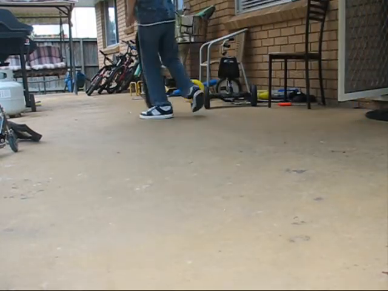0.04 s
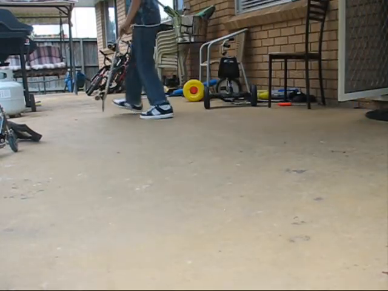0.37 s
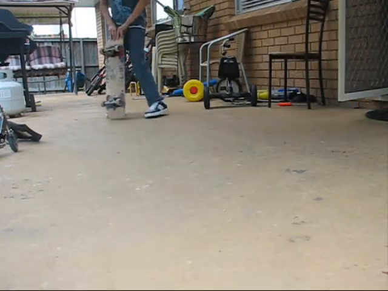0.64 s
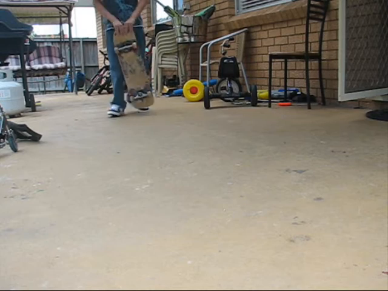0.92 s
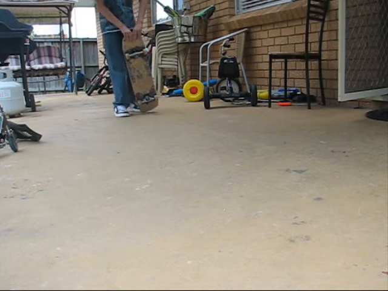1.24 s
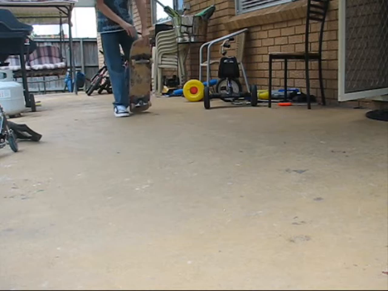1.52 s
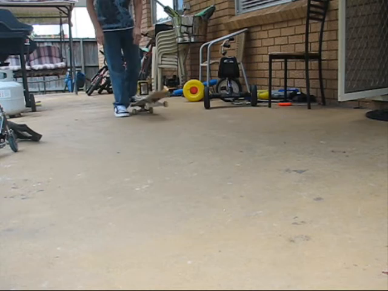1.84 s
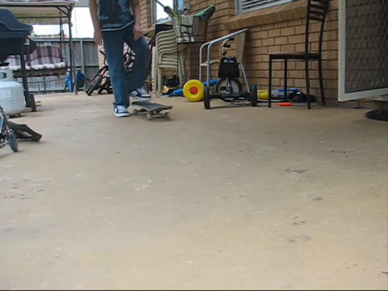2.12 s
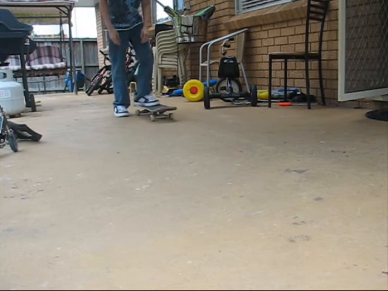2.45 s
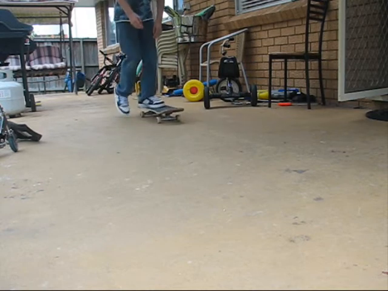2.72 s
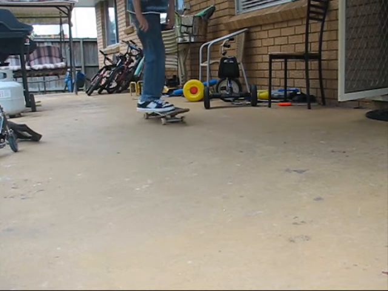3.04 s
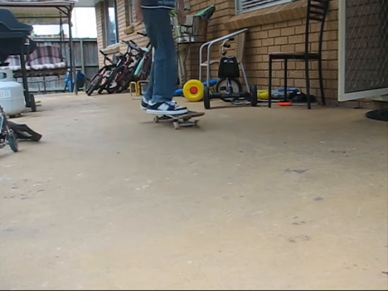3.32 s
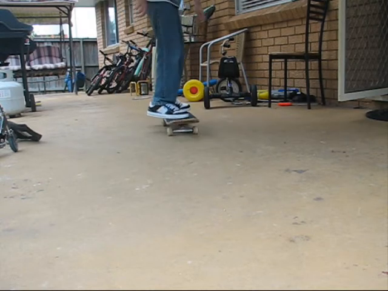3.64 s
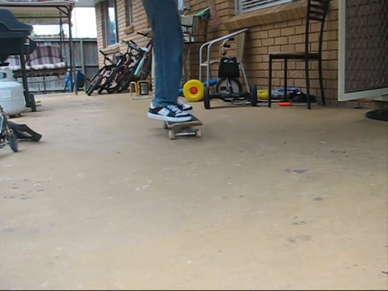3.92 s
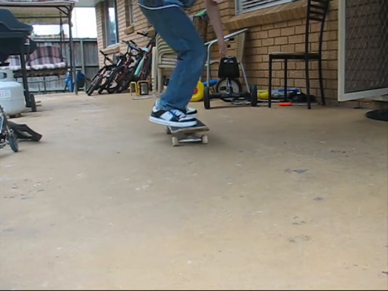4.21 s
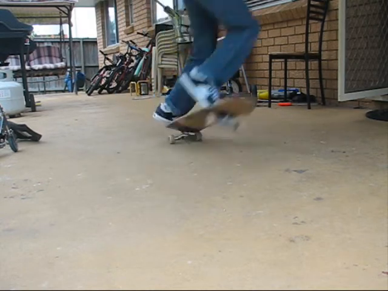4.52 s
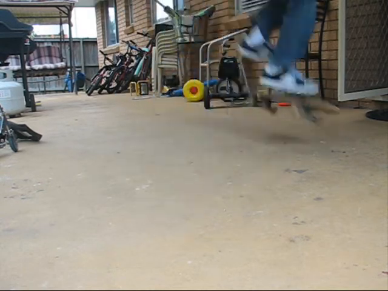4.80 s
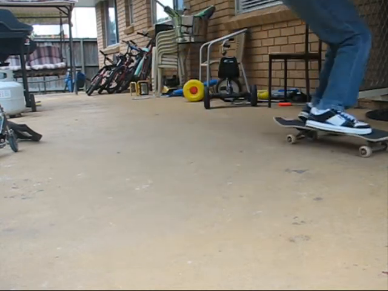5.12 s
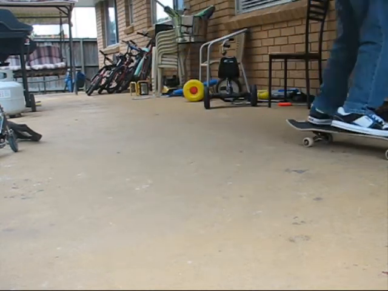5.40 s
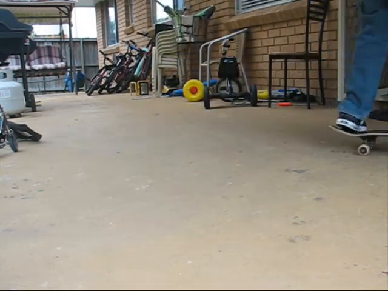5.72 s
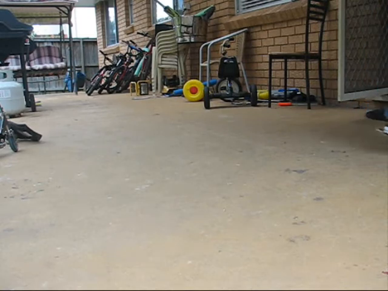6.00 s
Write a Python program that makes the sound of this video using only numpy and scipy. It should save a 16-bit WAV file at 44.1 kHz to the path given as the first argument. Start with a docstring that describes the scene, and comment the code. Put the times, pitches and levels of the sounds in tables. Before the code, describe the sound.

A light breeze rumbles under a soft distant wash throughout. A skateboard knocks lightly on concrete at about 0.6 seconds, then scrapes and clacks around 1 second. More wooden knocks come from 1.6 seconds, and at 2 seconds it drops onto its wheels with a clatter and a short roll. From 3 seconds the wheels rumble over grainy concrete, with single clacks at about 3, 3.3 and 3.7 seconds. Shoes and grip tape scuff around 4.4 seconds, the tail pops at 4.7, and the board lands in a loud cluster of clacks just before 5. The wheels ring unsteadily for about a second while rolling on, with further scuffs and knocks, a sharp one at 5.7 and lighter ones just after 6. Every hit rings the deck and echoes briefly off the patio wall and roof. The sound is lo-fi, with gritty treble.

```python
"""A light breeze rumbles under a distant wash; then a skateboard clacks on a roofed concrete patio.
It is knocked on its tail, dropped onto its wheels, rolled, pivoted, popped, landed and ridden off.
Each knock rings the wooden deck and echoes off brick wall and roof. Shoes and grip tape scuff,
wheels rumble over the concrete's grain and sing after the landing. A low-rate converter adds grit."""
import sys
import numpy as np
from scipy import signal
from scipy.fft import rfft, irfft
from scipy.io import wavfile
from scipy.ndimage import uniform_filter1d

SR = 44100
rng = np.random.default_rng(int(sys.argv[2]) if len(sys.argv) > 2 else 0)


def pcm_store(signal):
    """Save signal as 16-bit PCM."""
    levels = np.round(np.clip(np.atleast_2d(signal), -1, 1) * 32767)
    wavfile.write(sys.argv[1], SR, levels.astype(np.int16).T)


N = 271651


def amp(db):
    """Decibels to gain."""
    return 10 ** (np.asarray(db) / 20)


def unit_rms(x):
    """Scales to rms 1."""
    return x / np.sqrt(np.mean(x ** 2) + 1e-20)


def unit_energy(x):
    """Scales to energy 1 per channel."""
    return x / np.sqrt(np.sum(x ** 2, axis=-1, keepdims=True) + 1e-20)


def at_hz(points, hz):
    """Interpolates a table on a log-frequency axis."""
    points_hz, values = np.transpose(points)
    return np.interp(np.log(hz + 1), np.log(points_hz + 1), values)


def add(mix, start_s, sound):
    """Mixes a sound in at start_s."""
    part = mix[..., round(start_s * SR):][..., :sound.shape[-1]]
    part += sound[..., :part.shape[-1]]


def convolve(x, response):
    """Convolution cut to the length of x."""
    return signal.fftconvolve(np.atleast_2d(x), np.atleast_2d(response), axes=1)[:, :x.shape[-1]]


def colour(x, db_at, size=4096):
    """Minimum-phase filter with gain db_at(hz)."""
    hz = abs(np.fft.fftfreq(size, 1 / SR))
    log_gain = np.log(amp(np.maximum(db_at(hz), -100)))
    response = np.fft.ifft(np.exp(np.conj(signal.hilbert(log_gain)))).real
    return convolve(x, response[:size // 2])


def drift(length, smooth_samples):
    """Slow random wander, rms 1."""
    noise = rng.standard_normal(length)
    return unit_rms(uniform_filter1d(uniform_filter1d(noise, smooth_samples), smooth_samples))


def ringing(modes, t, spread_db):
    """Decaying sines; each blow shares its energy among them a little differently."""
    draws = rng.standard_normal((len(modes), 2))
    total = np.zeros(len(t))
    for (hz, db, t60_s), (deviation, phase) in zip(modes, draws):
        mode = np.sin(2 * np.pi * (hz * t + phase)) * amp(-60 * t / t60_s)
        total += amp(db + spread_db * deviation) * unit_energy(mode)
    return unit_energy(total)


# left-right coherence of diffuse sound (frequency [Hz], coherence [0-1])
COHERENCE = [(100, .975), (500, .975), (1000, .88), (2000, .74), (4000, .5)]

def diffuse(length):
    """White noise arriving from all sides at two close microphones."""
    mid, side = rfft(rng.standard_normal((2, length)))
    coherence = np.clip(at_hz(COHERENCE, np.fft.rfftfreq(length, 1 / SR)), 0, 1)
    mid *= np.sqrt((1 + coherence) / 2)
    side *= np.sqrt((1 - coherence) / 2)
    return irfft(np.array([mid + side, mid - side]), length)


# spectra of distant wash and breeze (frequency [Hz], relative density [dB])
WASH_SPECTRUM = [(20, -13.5), (70, -3), (150, -1), (300, -8), (600, -13.5), (1200, -14.5), (2200, -20),
                 (3500, -28.5), (5000, -32)]
BREEZE_SPECTRUM = [(5, -9.5), (20, -11), (33, -3), (45, -11), (70, -9), (110, -22), (300, -36.5),
                   (1000, -84)]
# low rumble, dipping briefly just after the landing (time [s], level [dB])
RUMBLE_LEVEL = [(0, -35.5), (1.55, -33), (2.0, -39), (2.7, -37.5), (4.6, -38.5), (5.1, -52), (5.7, -45),
                (6.16, -35)]

def outdoors(wash_db=-38.5, waver_db=0.5):
    """A soft distant wash and the low rumble of the breeze."""
    wash_gain = amp(wash_db + waver_db * drift(N, smooth_samples=3000))
    wash = unit_rms(colour(diffuse(N), lambda hz: at_hz(WASH_SPECTRUM, hz)))
    rumble_gain = amp(np.interp(np.arange(N) / SR, *np.transpose(RUMBLE_LEVEL)))
    rumble = unit_rms(colour(diffuse(N), lambda hz: at_hz(BREEZE_SPECTRUM, hz)))
    return wash_gain * wash + rumble_gain * rumble


def contact(chatter_s, touch=4.3, rise_s=.0005, side_db=-11, size=4096):
    """A hard first touch and a fast-dying chatter of wood and loose metal, spectrally flat."""
    t = np.arange(size) / SR
    burst = rng.standard_normal((2, size)) * np.exp(-t / chatter_s) * (1 - np.exp(-t / rise_s))
    burst[0, round(rise_s * SR)] += touch
    spectrum = rfft(burst, 2 * size)
    local_power = uniform_filter1d(abs(spectrum) ** 2, size=41, axis=1)
    flat = irfft(spectrum / np.sqrt(local_power))[:, :size]
    mid, side = flat * np.cos(np.pi / 2 * t / t[-1])
    side = amp(side_db) * signal.lfilter(*signal.butter(1, 1200, "high", fs=SR), side)  # bass stays mono
    return unit_energy(np.array([mid + side, mid - side]))


# modes of the board (frequency [Hz], relative level [dB], t60 [s])
DECK_MODES = [(172, -8, .1), (309, 0, .3), (370, -1, .35), (437, -3, .25), (492, -4, .2), (582, -7, .2),
              (675, -5, .22), (731, -1, .3), (812, -7, .16), (1032, -2, .22), (1388, -2, .2),
              (1507, -2, .22), (1870, -3, .18), (2293, -1, .24), (2653, 0, .28), (2913, -1, .22),
              (3073, 0, .28), (3269, 1, .26), (3424, 0, .26), (3536, 1, .26)]

def deck(t, spread_db, damping_db_per_s=0):
    """The wooden deck rings; feet and hands add damping."""
    return unit_energy(ringing(DECK_MODES, t, spread_db) * amp(-damping_db_per_s * t))


# patio reverberation (frequency [Hz], t60 [s])
PATIO_DECAY = [(100, 0.19), (300, 0.31), (700, 0.39), (1800, 0.31), (3200, 0.35), (5000, 0.29)]
# lingering patio resonances (frequency [Hz], relative level [dB], t60 [s])
PATIO_MODES = [(295, 1.8, 1), (352.2, 11.2, 1), (431, 5.1, .7), (498, 7, 0.55), (568, 7, 0.64), (725, 5, 1)]

def patio(t, build_s=0.0054, modes_db=-24):
    """Echoes off wall, roof and clutter build up, then die band by band over a few lingering tones."""
    hz, frame_s, bands = signal.stft(diffuse(len(t)), SR, nperseg=256)
    decay = amp(-60 * frame_s / at_hz(PATIO_DECAY, hz)[:, None])
    tail = signal.istft(bands * decay, SR, nperseg=256)[1][:, :len(t)]
    echoes = unit_energy(tail * (1 - np.exp(-t / build_s)))
    return echoes + amp(modes_db) * ringing(PATIO_MODES, t, spread_db=1.0)


def hump(hz, centre_hz, relative_width):
    """Resonance curve: 0.8 at the centre, -0.2 far from it."""
    return 1 / (1 + ((hz - centre_hz) / (relative_width * centre_hz)) ** 2) - .2


# mean spectrum of a knock (frequency [Hz], relative density [dB])
KNOCK_SPECTRUM = [(30, -19), (80, -5.5), (140, 1), (220, -2), (340, 1.5), (520, 1.5), (760, -1),
                  (1000, -2.5), (2100, -6), (3200, -12.5), (4200, -16.5), (5500, -15)]

def knock_colour(x, tilt_db_per_oct, thud_db, body_hz, body_db, clack_hz,
                 clack_db=1.5, hollow_db=2.0, thud_hz=145, pivot_hz=970):
    """Tilt sets brightness, weight thuds, damped neighbours of the two main modes sound hollow."""
    def gain_db(hz):
        tilt = tilt_db_per_oct * np.log2(np.clip(hz, 150, 3500) / pivot_hz)
        thud = thud_db * hump(hz, thud_hz, .4)
        broad = body_db * hump(hz, body_hz, .35) + clack_db * hump(hz, clack_hz, .35)
        hollow = hollow_db * (hump(hz, body_hz, .1) + hump(hz, clack_hz, .1))
        return at_hz(KNOCK_SPECTRUM, hz) + tilt + thud + broad + hollow

    mean_power = np.mean(amp(at_hz(KNOCK_SPECTRUM, np.linspace(0, SR / 2, 2048))) ** 2)
    return colour(x, gain_db) * np.sqrt(SR / mean_power)


# contact kind: (body mode [Hz], body lift [dB], thud [dB], patio echo [dB])
CONTACT_KINDS = { "end": (366, 1.2, 2, -2), "held": (490, 2.5, -2, -4.5), "deck": (306, 2, -2, -1.5),
                 "edge": (590, 2, 2, -2), "truck": (438, 3.5, 0, -2), "wheel": (733, 6.5, -4, -2.5),
                 "slam": (738, 7, 5, -2), "slap": (520, -1, 9, -2), "tail": (815, 2.5, -3, -2),
                 "foot": (172, 3, 3, -2)}
# blows on deck, trucks and wheels (time [s], contact kind, relative level [dB], chatter decay [s],
# tilt [dB/oct], clack pitch [Hz], body and clack ring [dB])
BLOWS = [ (0.5723, "end", -34.8, .013, -.4, 1844, -9), (0.7081, "edge", -33.3, .019, 1.8, 1995, -8.5),
         (1.1066, "held", -26.6, .014, -.7, 2710, -7), (1.156, "held", -28.3, .011, -1.8, 1500, -7),
         (1.1648, "held", -32.5, .005, 2, 1960, -1), (1.595, "end", -31.3, .018, 0, 1028, -4),
         (1.615, "end", -34.5, .05, 1.2, 2290, -6), (1.656, "deck", -33, 0.012, -.2, 1390, -4),
         (1.694, "truck", -36.2, .017, -.2, 1032, -3.5), (1.804, "deck", -24.3, 0.0047, 0.37, 2060, -4.5),
         (2.038, "slam", -24.3, .008, 3, 1385, -3), (2.147, "wheel", -31.5, .03, 1.2, 1878, -5),
         (2.185, "wheel", -38.5, .01, 1, 1505, -.5), (2.208, "wheel", -36, 0.12, 1.8, 1477, -2),
         (2.369, "edge", -42, 0.038, -1.9, 1810, -5.5), (3.0395, "slap", -28.8, 0.0094, 1.9, 2000, -4.5),
         (3.305, "edge", -33, 0.026, 1.2, 1920, -4.5), (3.6904, "tail", -25.7, 0.012, .6, 1370, -6.5),
         (4.545, "wheel", -39.5, 0.016, -1.5, 1384, -3.5), (4.627, "end", -43.5, 0.0059, -3.3, 1035, 1),
         (4.669, "tail", -24.7, .004, .6, 2400, -4), (4.8696, "slap", -23.3, 0.0048, 2.8, 2230, -13),
         (4.9374, "deck", -20.5, .0069, 1.7, 3073, -3), (4.96, "wheel", -30.5, .014, -1.8, 1507, .5),
         (4.978, "tail", -28, 0.0086, -.6, 1810, -11), (4.998, "truck", -29.8, 0.009, -1.2, 1520, -3.5),
         (5.376, "slap", -32, .01, -2.1, 1534, -5), (5.58, "edge", -34.3, 0.016, 0, 1545, -4.5),
         (5.59, "foot", -43.5, .015, -3, 1380, -8), (5.7369, "end", -25.2, .008, .2, 1985, 2),
         (5.792, "foot", -37, 0.011, -3, 1380, -8), (6.08, "foot", -46, .04, -5.5, 1380, -8),
         (6.117, "end", -34, 0.0097, .2, 3073, -2), (6.148, "truck", -36.5, .013, -5.3, 1390, -9)]

def knocks(gain_db=-3.5, deck_db=-12, body_ring_db=-14, clack_ring_db=-12,
           body_t60_s=.28, clack_t60_s=.1, pair_ratio=1.0346):
    """Blows ring deck and patio, each with its own brightness and clack; kind sets body and thud."""
    out, t = np.zeros((2, N)), np.arange(SR * 3 // 4) / SR
    for start_s, kind, db, chatter_s, tilt_db_per_oct, clack_hz, ring_db in BLOWS:
        body_hz, body_db, thud_db, echo_db = CONTACT_KINDS[kind]
        knock = amp(echo_db) * patio(t) + amp(deck_db) * deck(t, spread_db=3.5, damping_db_per_s=90)
        body = ringing([(body_hz, 0, body_t60_s)], t, spread_db=0)
        nose_and_tail = [(clack_hz, 0, clack_t60_s), (clack_hz * pair_ratio, -3, clack_t60_s)]
        clack = ringing(nose_and_tail, t, spread_db=0)
        knock += amp(ring_db) * (amp(body_ring_db) * body + amp(clack_ring_db) * clack)
        add(knock, 0, contact(chatter_s))
        knock = knock_colour(knock, tilt_db_per_oct, thud_db, body_hz, body_db, clack_hz)
        add(out, start_s, amp(db + gain_db) * knock)
    return out


def grit(grains_per_s, spread_db):
    """Sand crushed under a wheel or sole: sparse clicks of uneven size."""
    sizes = amp(spread_db * np.minimum(rng.exponential(1, N), 4))
    signs = rng.choice([-1, 1], N)
    hits = rng.random(N) < grains_per_s / SR
    return unit_rms(sizes * signs * hits)


# sliding friction spectrum (frequency [Hz], relative density [dB])
SCUFF_SPECTRUM = [(100, -19.5), (400, -11), (900, 4.5), (2300, -1), (3500, 0.5), (5000, -4)]
# slides (time [s], length [s], level [dB], tilt [dB/oct])
SLIDES = [(0.982, 0.047, -27.5, 3), (1.013, .055, -24, 2), (2.03, 0.0082, -28, -7),
          (3.465, 0.034, -35, -2.5), (4.379, 0.032, -30.5, 1), (4.482, 0.1, -30, -4.5),
          (4.608, 0.1, -28, -5.5), (5.327, 0.057, -34, -3), (5.645, 0.081, -29, -6.5),
          (6.003, 0.035, -31.5, 4.5)]

def scuffs(echo_db=-3):
    """Shoes, grip tape and tail slide in short gritty strokes that swell and stop."""
    out, grains = np.zeros((1, N)), grit(grains_per_s=4500, spread_db=-1)
    for start_s, length_s, db, tilt_db_per_oct in SLIDES:
        stroke = grains[round(start_s * SR):][:round(length_s * SR)]
        stroke = colour(stroke, lambda hz: at_hz(SCUFF_SPECTRUM, hz) + tilt_db_per_oct * np.log2(hz + 1))
        envelope = signal.windows.tukey(stroke.shape[1], .5)
        add(out, start_s, amp(db) * unit_rms(stroke) * envelope)
    return out + amp(echo_db) * convolve(out, patio(np.arange(SR // 2) / SR))


# runs of the wheels (peak time [s], level [dB], 20 dB swell [s], 20 dB fade [s])
RUNS = [ (2.11, -28, 0.055, 0.45), (3.39, -25.5, .34, 0.31), (4.15, -34.3, 0.31, 0.76),
        (4.51, -24.5, .12, .17), (4.65, -24.3, 0.14, .12), (4.96, -17.5, .035, .085),
        (5.07, -30, 0.45, 0.55), (5.63, -24.5, 0.14, .38), (6.16, -19.5, .15, .3)]

def wheel_load(rounding=1.18):
    """Each run swells as weight and speed come onto the wheels, then dies away."""
    t, power = np.arange(N) / SR, np.zeros(N)
    for peak_s, db, swell_s, fade_s in RUNS:
        from_peak = np.minimum(abs(t - peak_s) / np.where(t < peak_s, swell_s, fade_s), 10)
        power += amp(db - 20 * from_peak ** rounding) ** 2
    return np.sqrt(power)


# spectrum of wheels on concrete (frequency [Hz], relative density [dB])
ROLL_SPECTRUM = [(65, -40.5), (110, 2), (156, 1.5), (298, -3.5), (471, 2), (569, -5), (656, -0.5),
                 (844, -2.5), (928, -10), (1420, -11.5), (1590, -13), (3560, -21.5), (4800, -27.5),
                 (6240, -65), (10600, -120)]

def rolling(deck_db=-15, echo_db=-1):
    """The wheels run over the grain of the concrete and shake the deck."""
    t = np.arange(SR // 2) / SR
    response = amp(echo_db) * patio(t) + amp(deck_db) * deck(t, spread_db=4)
    response[:, 0] += 1  # direct path
    shaking = convolve(grit(grains_per_s=900, spread_db=2.0), response)
    rumble = colour(shaking, lambda hz: at_hz(ROLL_SPECTRUM, hz))
    return unit_rms(rumble) * wheel_load()


# ring of the landing (time [s], rms level over 1 s [dB])
LANDING_RING = (4.96, -27)
# modes of loaded wheels and trucks (frequency [Hz], relative level [dB], t60 [s])
WHEEL_TRUCK_MODES = [(362.2, 1, 1.4), (366, -7, .6), (420, -23, 0.45), (660, 3.5, 0.93), (740, -7, 1.2),
                     (806, 4.5, 0.34)]

def wheel_song(waver_depth=0.4):
    """The landing leaves wheels and trucks ringing, unsteadily as the wheels turn."""
    out, t = np.zeros(N), np.arange(SR) / SR
    start_s, db = LANDING_RING
    waver = 1 + waver_depth * drift(SR, smooth_samples=900)
    song = ringing(WHEEL_TRUCK_MODES, t, spread_db=-2.5) * waver
    add(out, start_s, amp(db) * unit_rms(song))
    return out


def scene():
    """The outdoor background and the board."""
    return outdoors() + knocks() + scuffs() + rolling() + wheel_song()


# low-pass ahead of the converter (frequency [Hz], gain [dB])
INPUT_LOWPASS = [(3000, -1), (4000, -1.5), (4600, -6), (5000, -14.5), (5400, -34), (5900, -60), (7000, -82)]
# microphone balance (frequency [Hz], left minus right [dB])
BALANCE = [(100, -1.5), (300, -2.5), (550, -1.9), (1000, -1.5), (2000, -4.5), (4000, -3)]

def record(dry, hold_samples=4, cutoff_hz=15500):
    """A low-rate converter clips overloads and holds each sample, mirroring sound into gritty treble."""
    filtered = np.vstack([colour(x, lambda hz: at_hz(INPUT_LOWPASS, hz) + side * at_hz(BALANCE, hz))
                          for x, side in zip(dry, (.5, -.5))])
    sampled = np.clip(filtered[:, ::hold_samples], -1, 1)
    stepped = np.repeat(sampled, hold_samples, axis=1)[:, :N]
    lowpass = signal.firwin(127, cutoff_hz, window=("kaiser", 7), fs=SR)
    return signal.oaconvolve(stepped, lowpass[None], "same")


dry = scene()
out = record(dry)
pcm_store(out)
```